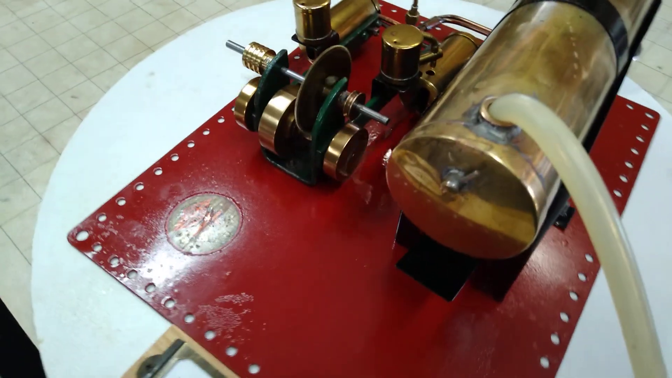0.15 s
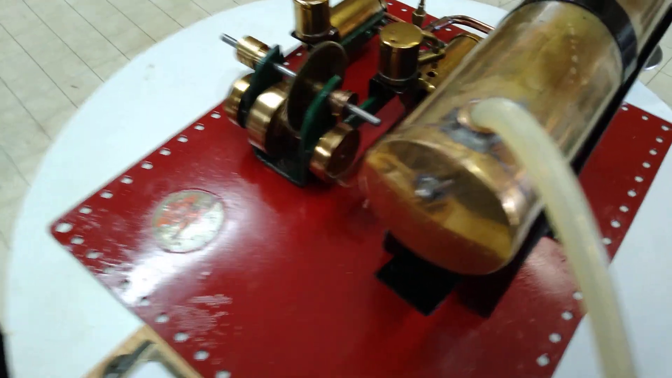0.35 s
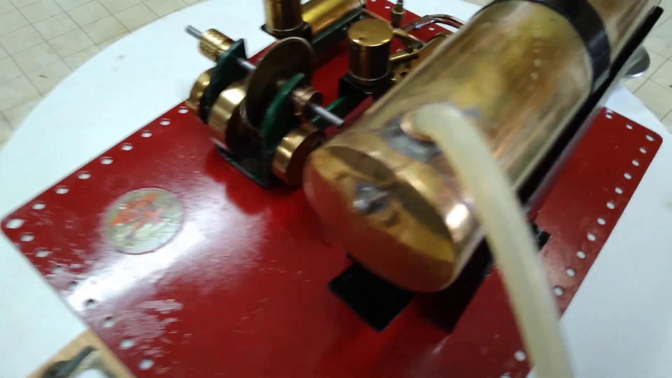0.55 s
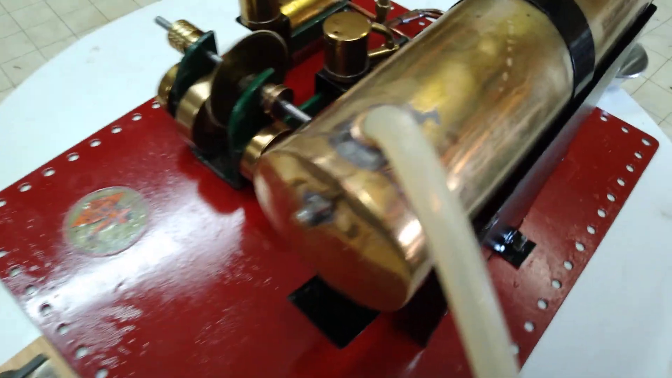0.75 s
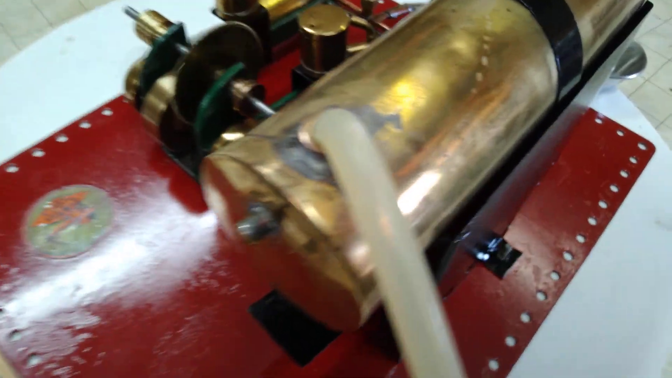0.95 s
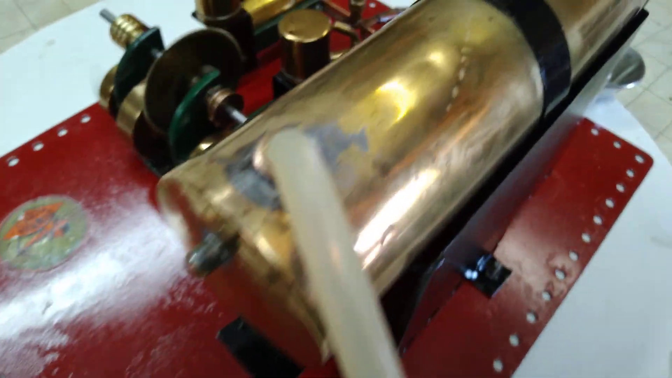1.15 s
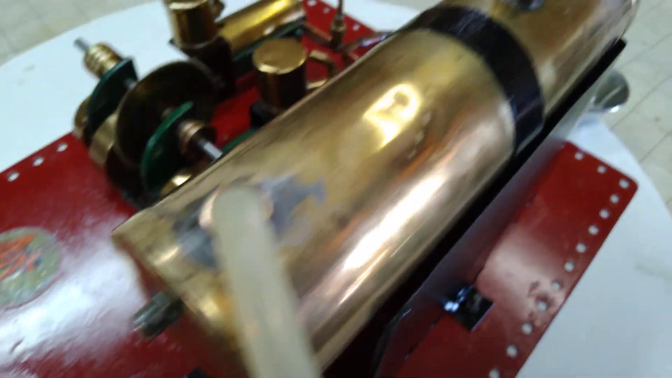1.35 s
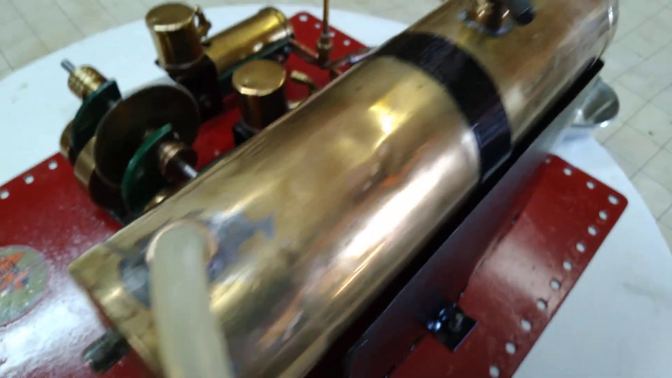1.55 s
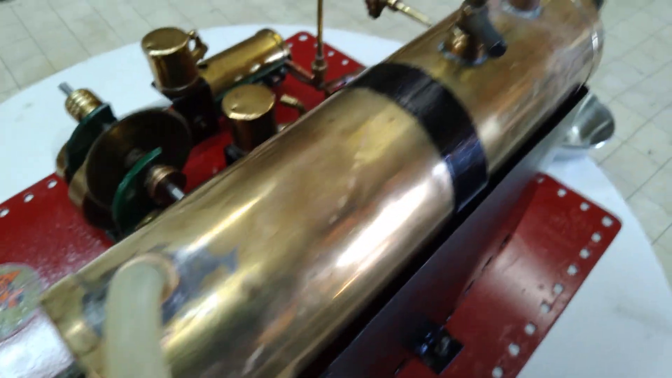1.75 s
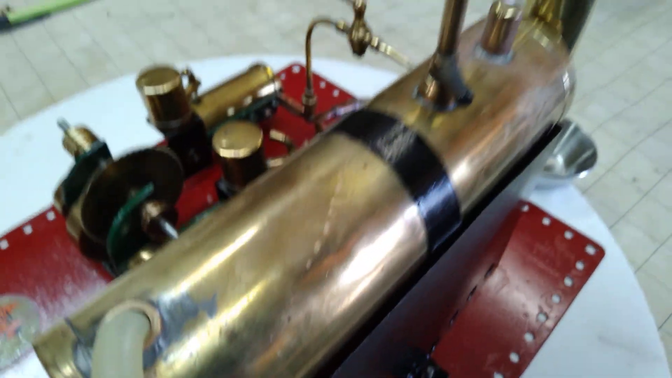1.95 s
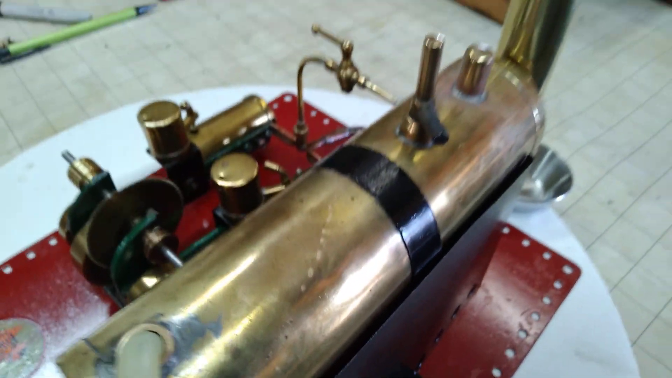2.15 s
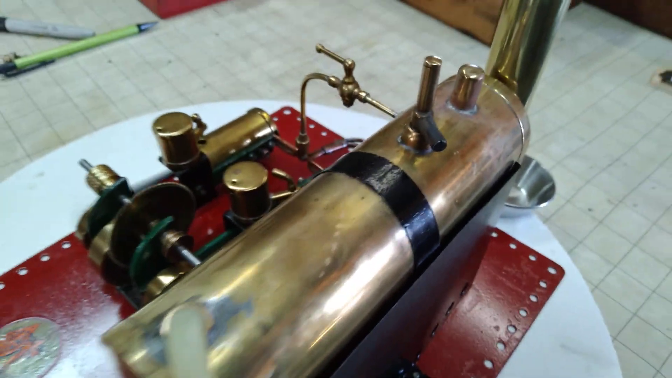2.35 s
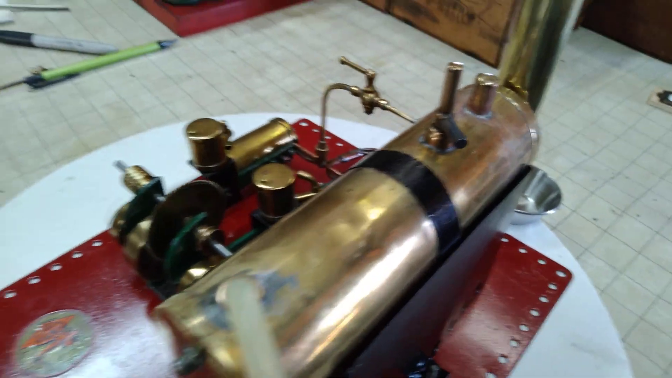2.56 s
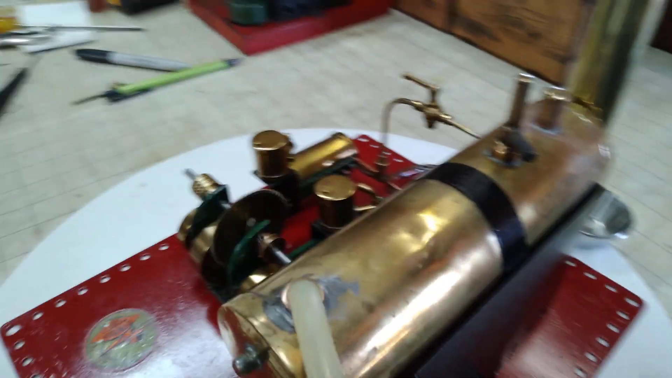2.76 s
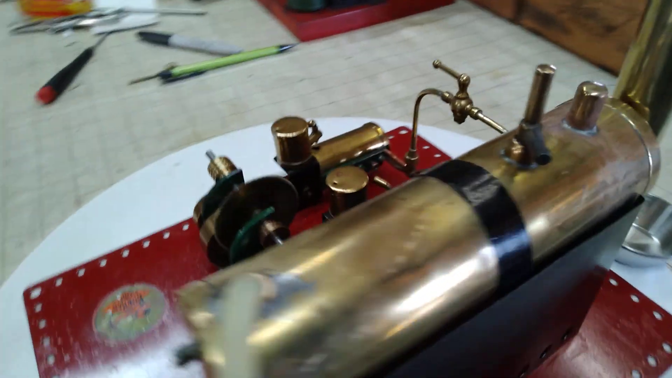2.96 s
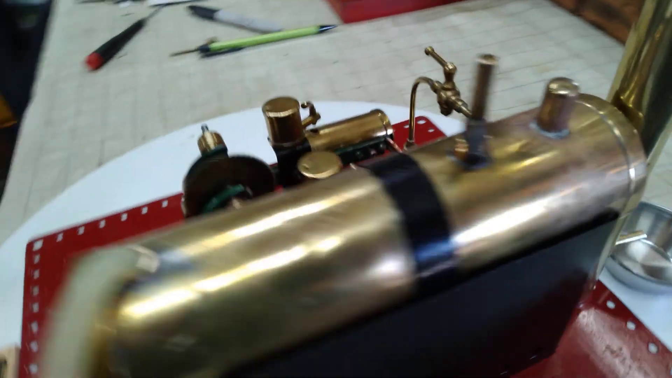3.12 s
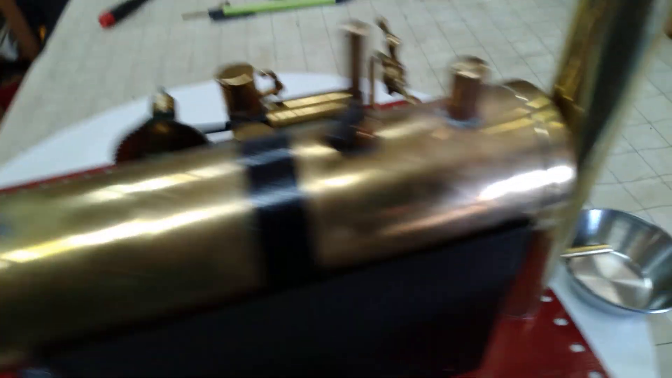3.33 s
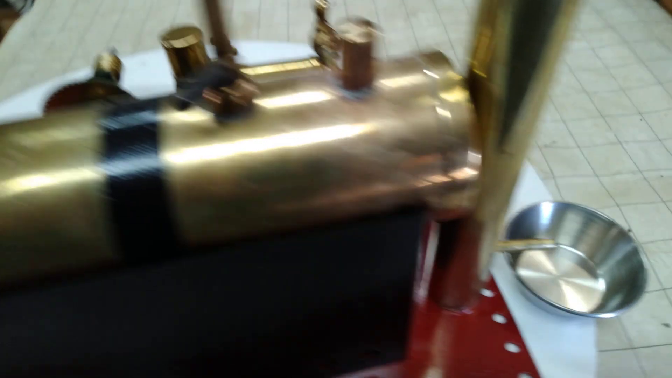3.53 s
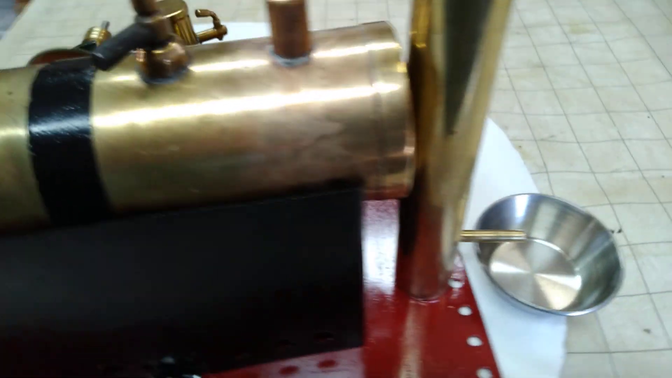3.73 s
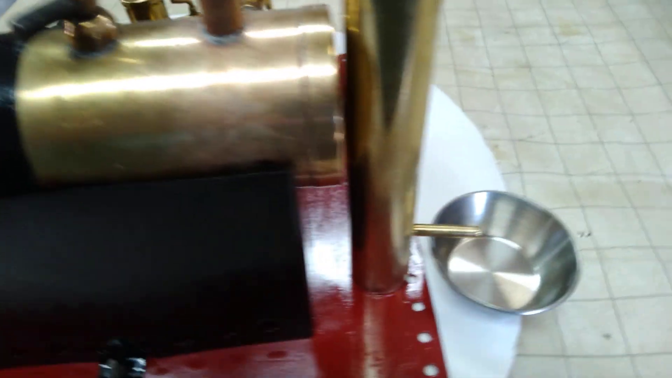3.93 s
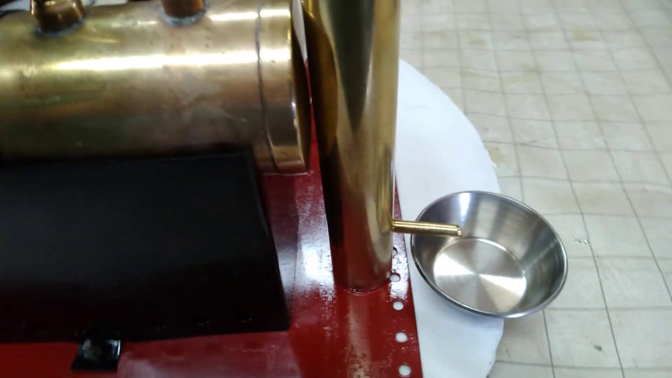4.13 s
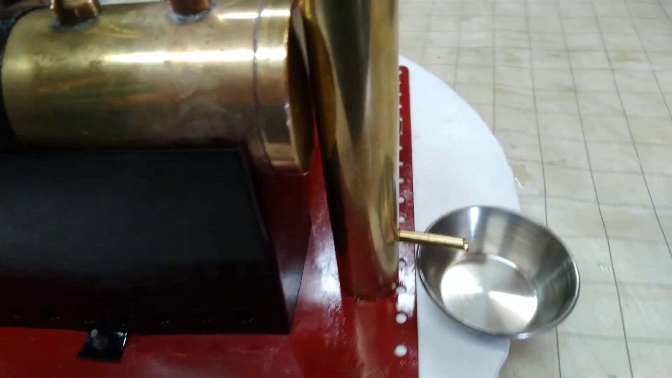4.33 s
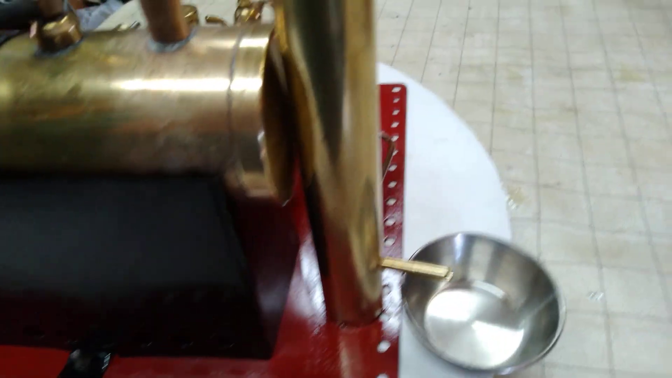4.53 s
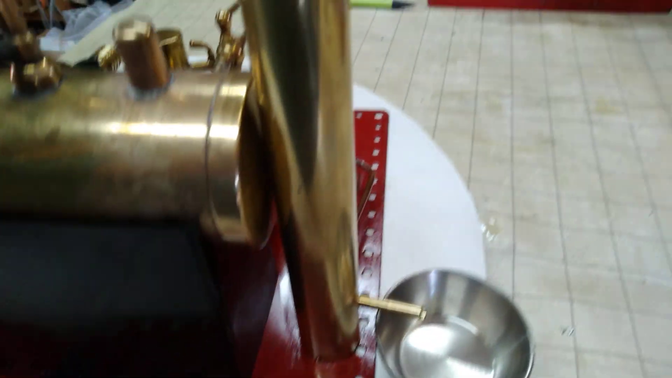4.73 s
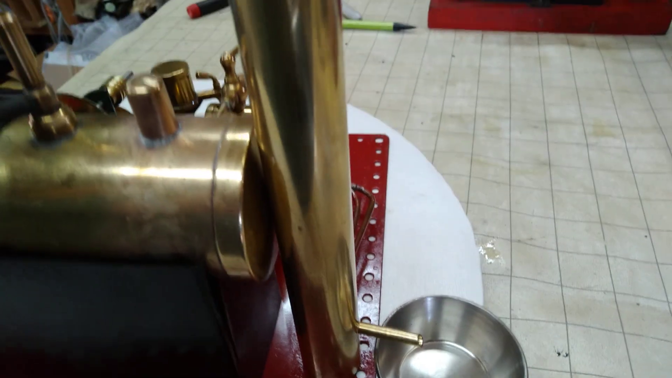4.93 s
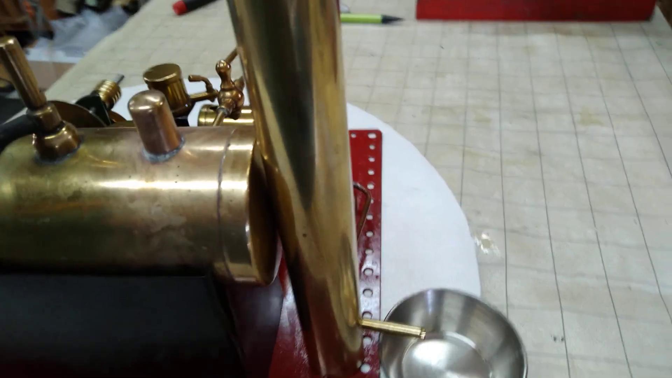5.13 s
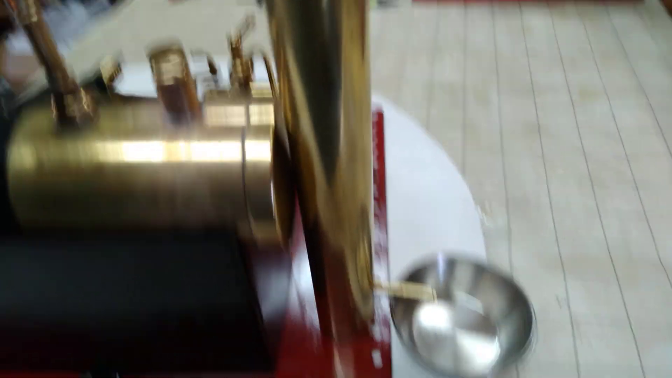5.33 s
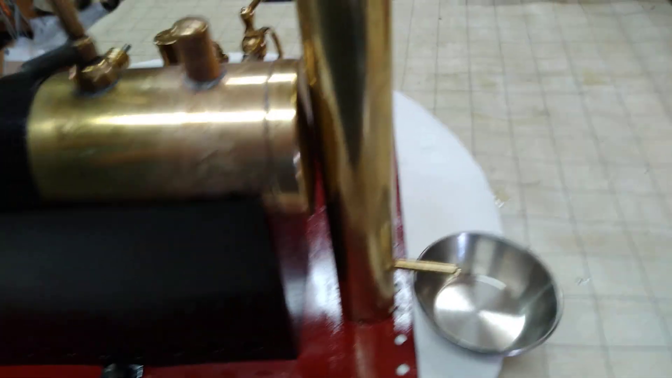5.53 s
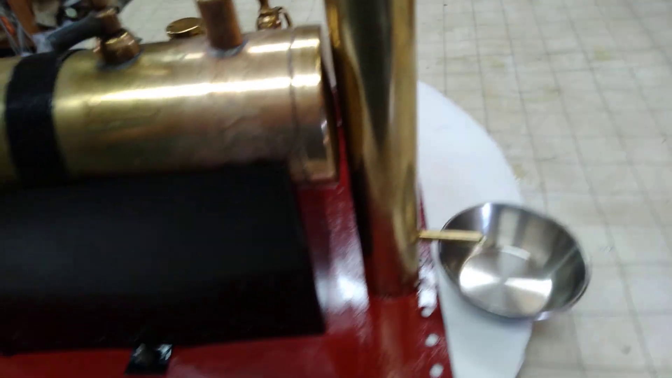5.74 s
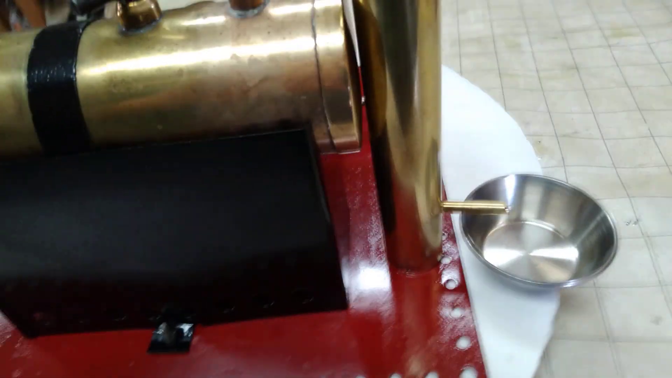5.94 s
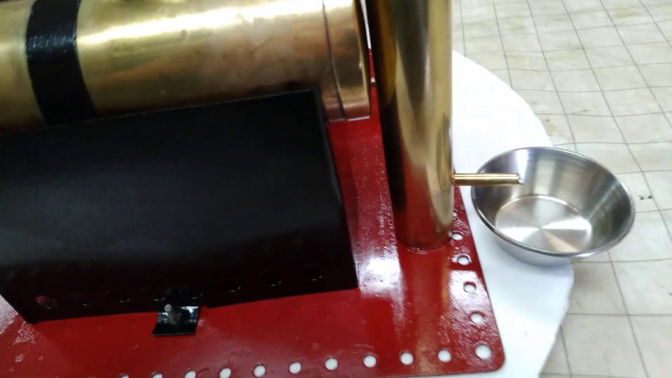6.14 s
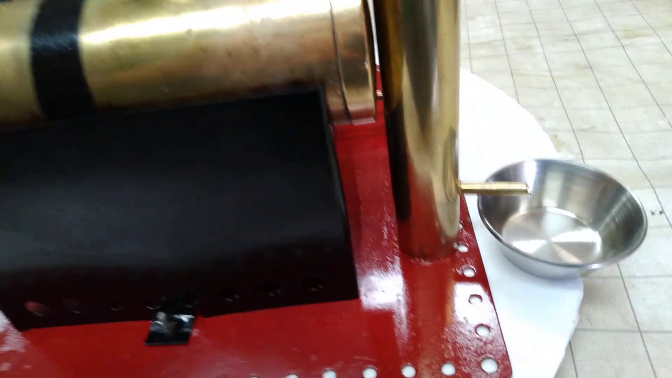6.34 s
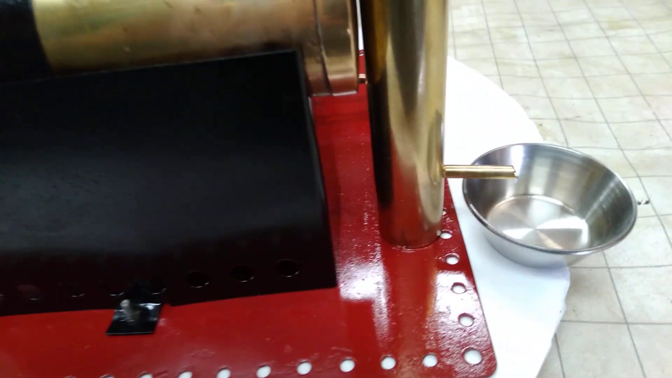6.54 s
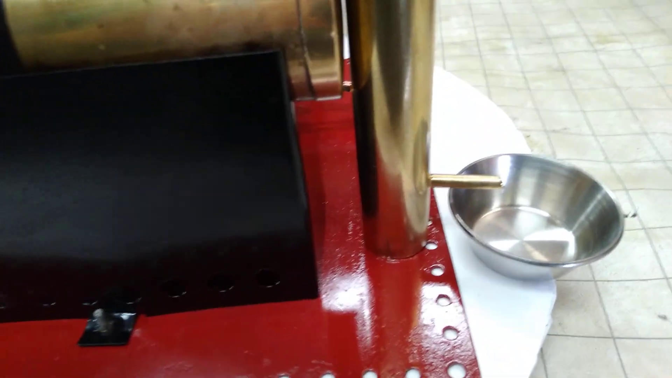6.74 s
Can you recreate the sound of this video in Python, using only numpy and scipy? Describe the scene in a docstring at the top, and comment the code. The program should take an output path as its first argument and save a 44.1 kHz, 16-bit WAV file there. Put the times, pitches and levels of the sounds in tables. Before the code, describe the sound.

Close stereo phone pickup of a miniature engine running without pause: about thirteen turns per second, each a cluster of metallic knocks with ringing brass, small low thumps through a tin plate and hollow exhaust puffs. Gears rasp strongly early on, then recede as the microphone passes behind the boiler. The room is quiet with a short faint echo; towards the end the treble thins and a narrow buzzing hum swells.

```python
"""A fast metallic clatter with a raspy buzz: a small twin-cylinder model steam engine on compressed air.
It makes about 13.5 turns a second on a tin baseplate in a small workshop.
Every turn, loose bearings and gears knock and ring the brass, pistons thump the plate
and puffs of exhaust sound the chimney, while air hisses from the glands.
A hand-held phone moves along the boiler to the chimney end, so each part is heard differently on the way."""
import sys
import numpy as np
from scipy import signal
from scipy.fft import rfft, irfft
from scipy.io import wavfile
from scipy.ndimage import uniform_filter1d

SR = 44100
rng = np.random.default_rng(int(sys.argv[2]) if len(sys.argv) > 2 else 0)


def file_out(sig):
    """Save sig as 16-bit WAV at sys.argv[1]."""
    # one column per channel
    cols = np.atleast_2d(sig).T
    # limit, then scale
    lim = np.clip(cols, -1, 1)
    pcm = np.round(lim * 32767).astype(np.int16)
    wavfile.write(sys.argv[1], SR, pcm)


N = 298998


def undb(db):
    """Turn decibels into gain."""
    return 10 ** (np.asarray(db) / 20)


def unit(x):
    """Scale so that the average of the channels has rms 1."""
    middle = np.atleast_2d(x).mean(axis=0)
    return x / np.sqrt(np.mean(middle ** 2))


def curves(table):
    """Draw each column of a time table as a line, sample by sample."""
    s, *columns = np.transpose(table)
    return [np.interp(np.arange(N) / SR, s, c) for c in columns]


def pan(db):
    """Left and right gains for a level difference, keeping the mean power."""
    gains = np.array([undb(db / 2), undb(-db / 2)]).reshape(2, -1)
    return gains / np.sqrt(np.mean(gains ** 2, axis=0))


def band(x, low_hz, high_hz, order=3):
    """Keep one band of frequencies."""
    return signal.sosfilt(signal.butter(order, [low_hz, high_hz], "band", fs=SR, output="sos"), x)


def colour(x, hz, db, size=512):
    """Filter through (f/Hz, level/dB) points without sounding ahead of time (minimum phase)."""
    f = np.maximum(np.arange(size // 2 + 1) * SR / size, 1)
    cepstrum = irfft(np.log(undb(np.interp(np.log(f), np.log(hz), db))))
    # folding the cepstrum forward puts all of the response after time zero
    cepstrum[1:size // 2] *= 2
    cepstrum[size // 2 + 1:] = 0
    return signal.fftconvolve(x, irfft(np.exp(rfft(cepstrum))))[:N]


def ring(x, modes, place, damping=1):
    """Parallel resonances, each with its own side and its own change of level with place (0-1)."""
    total = 0
    for hz, width, db, side_db, change_db in modes:
        gain = undb(db) * (1 + place * (undb(change_db) - 1))
        rung = signal.lfilter(*signal.iirpeak(hz, hz / (width * damping), SR), x)
        total = total + gain * pan(side_db) * rung
    return total


def strikes(times, sizes):
    """Single-sample impulses at the given times."""
    out, at = np.zeros(N), np.round(times * SR).astype(int)
    inside = (at >= 0) & (at < N)
    np.add.at(out, at[inside], sizes[inside])
    return out


def fade(x, decay_s):
    """Give every impulse an exponential tail."""
    return signal.lfilter([1], [1, -np.exp(-1 / (decay_s * SR))], x)


def noise_pair(apart):
    """Noise for two microphones; apart is the weight of the unshared part."""
    shared, own = rng.standard_normal((2, N))
    return (shared + apart * own * np.array([[1], [-1]])) / np.sqrt(1 + apart ** 2)


def each_turn(turns, angle, db, scatter_db, scatter_s, share=1, memory=0):
    """An impulse whenever the crank passes an angle; with memory, time and strength drift slowly."""
    passes = np.arange(int(turns[-1]) + 1) + angle
    times = np.interp(passes, turns, np.arange(N) / SR, left=-1, right=-1)
    chance = rng.standard_normal((len(times), 2)).T
    late, louder = signal.lfilter([np.sqrt(1 - memory ** 2)], [1, -memory], chance)
    happens = rng.random(len(times)) < share
    return strikes(times + scatter_s * late, happens * undb(db + scatter_db * louder))


def left_late(x, lag_s):
    """The engine is to the right, so its sound reaches the left microphone later."""
    n = np.arange(N)
    return np.array([np.interp(n - lag_s * SR, n, x[0]), x[1]])


def sway(rate):
    """Slow chance movement of a hand-held phone; spread near 1, rate in steps per second."""
    k = int(SR / rate)
    steps = np.repeat(rng.standard_normal(N // k + 1), k)
    return 1.75 * uniform_filter1d(uniform_filter1d(steps, k), k)[:N]


# crank speed, which creeps up, sags just after 3 s and recovers: t/s, speed/(turns per s)
CRANK_SPEED = [(0.0, 13.35), (0.45, 13.438), (0.95, 13.374), (2.4, 13.509), (2.9, 13.61), (3.15, 13.47),
               (4.15, 13.404), (4.95, 13.635), (5.9, 13.623), (6.35, 13.727), (6.78, 13.536)]


def crank():
    """Crank position in turns: the speed added up over time."""
    start_turns = .006
    return start_turns + np.cumsum(curves(CRANK_SPEED)[0]) / SR


TOP_HZ = 15900
# tone colour of the quiet workshop: f/Hz, relative level/dB (per Hz)
QUIET_COLOUR = [(20, -23), (42, -1), (70, 37), (150, -13), (400, -23), (1000, -19), (3000, -23),
                (16000, -20)]


def workshop(x, t60_s=0.19, wet_db=-18, quiet_db=-66):
    """A short diffuse echo of mids and treble from bench and walls, over the quiet of the room."""
    t = np.arange(SR // 2) / SR
    tails = rng.standard_normal((2, len(t))) * np.exp(-np.log(1000) * t / t60_s) * (t > .004)
    tails /= np.sqrt(np.sum(tails ** 2, axis=1, keepdims=True))
    echo = signal.fftconvolve(band(x, 560, TOP_HZ), tails, axes=1)[:, :N]
    hz, db = np.transpose(QUIET_COLOUR)
    quiet = unit(np.array([colour(n, hz, db, size=4096) for n in noise_pair(0.18)]))
    return x + undb(wet_db) * echo + undb(quiet_db) * quiet


# shocks that the moving parts give the plate: crank angle/turns, level/dB
PLATE_SHOCKS = [(0.112, -0.5), (0.279, -2), (0.46, -3), (0.561, -1.5), (0.716, -9.5), (0.859, 1),
                (0.969, 3.5)]
# low modes of plate and table: f/Hz, width/Hz, level/dB, left minus right/dB, change behind the boiler/dB
TABLE_MODES = [(71.5, 34, -0.5, -10, 13.5), (99, 65, 2.5, 19, -18), (143.4, 30.5, 7, -3, 2),
               (167, 7.3, -9, -29, -20), (227.3, 4.6, 4, -11, -20), (345, 130, -11, -11, -29),
               (442, 48, -2, 1.5, 10.5)]
# bass along the phone's path: t/s, deep bass level/dB, upper bass level/dB
BASS_PATH = [(0, -1, -5), (.8, -1, -1), (1.5, 1, 0), (2.15, -1, 1.5), (2.6, -0.5, -4.5), (2.9, -3, 2.5),
             (3.2, -4.5, 2), (3.7, 0, 1.5), (4.5, 0, 2.5), (4.9, 0, -1), (5.25, -3.5, -1), (5.65, 1, -4),
             (6.05, -1, 3), (6.3, 0.5, -1), (6.78, 2.5, 4.5)]


def baseplate(turns, place):
    """Pistons and cranks shake the plate and the table under it, almost alike in every turn."""
    shocks = sum(each_turn(turns, angle, db, 1, .0003, memory=.94) for angle, db in PLATE_SHOCKS)
    shocks = shocks + .012 * noise_pair(1.0)
    deep = band(ring(shocks, TABLE_MODES[:2], place), 48, 500, order=4)
    upper = band(ring(shocks, TABLE_MODES[2:], place), 48, 500, order=4)
    deep_db, upper_db = curves(BASS_PATH)
    return unit(deep * undb(deep_db) + upper * undb(upper_db))


# modes of the frame: f/Hz, width/Hz, level/dB, left minus right/dB, change behind the boiler/dB
CLACK_MODES = [(880, 120, 2.5, 0, 4), (1230, 90, -6, -3, -5), (1650, 73, -3.5, 0, 0),
               (1980, 290, -8, -4, 1.5)]
# level of the clack, which sets in as the speed sags: t/s, level/dB
CLACK_PATH = [(2.9, -75), (3.25, -59), (4.4, -55), (5.6, -56.5), (6.1, -70)]


def clack(hit, place, decay_s=0.0014):
    """One knock of the return stroke also rattles the frame with a dull clack."""
    rattle = noise_pair(0.97) * np.sqrt(fade(hit ** 2, decay_s / 2))
    return unit(band(ring(rattle, CLACK_MODES, place), 650, 2900)) * undb(curves(CLACK_PATH)[0])


# exhaust puffs in each turn: crank angle/turns, level/dB
EXHAUST_PUFFS = [(.01, -3.5), (0.075, -6), (0.191, -8), (0.291, -9.5), (.36, -6), (0.423, -8.5), (.5, -10),
                 (0.572, -7.5), (0.639, -4.5), (0.736, -8), (0.866, -4)]
# air column of exhaust pipe and chimney:
# f/Hz, width/Hz, level/dB, left minus right/dB, change behind the boiler/dB
PIPE_MODES = [(430, 32, -6.5, -24, -7), (461.3, 31.7, -0.5, -4.5, 3), (845, 59, 3.5, -9, -5.5),
              (894, 26, 5, 3.5, -4.5), (948, 88, -9, 6.5, 11.5), (1041, 62, -7.5, -1.5, 9.5),
              (1260, 90, 0, 1, -6.5)]


def exhaust(turns, place, puff_s=0.0052, flow=0.18, pop_db=0.0, lag_s=0.00019):
    """Air leaves in puffs: a port opens with a pop that sounds the pipe, then air rushes through it."""
    pops = sum(each_turn(turns, angle, db, 1.2, .0003, memory=.96) for angle, db in EXHAUST_PUFFS)
    rush = band(unit((fade(pops, puff_s) + flow) * noise_pair(0.19)), 600, 4100)
    drive = rush + undb(pop_db) * unit(pops)
    return unit(left_late(ring(drive, PIPE_MODES, place), lag_s))


# gear rasp in the baseplate:
# f/Hz, width/Hz, level/dB, left minus right/dB, change in the firebox's shadow/dB
PLATE_MODES = [(303, 120, 8, -8, -4), (432, 130, 10.5, -2.5, -24), (736, 130, 0, 9, -17),
               (1080, 60, 0, -5, 14), (1232, 146, -9, -14, 17), (1463, 54, 8.5, -3.5, 8),
               (1602, 84, 6, 6.5, 4), (1817, 280, 1, 0.5, 1.5), (2334, 38.5, 12, -27, 0),
               (3080, 670, 9.5, -4.5, -26)]


def gears(turns, shadow, depth=0.098, lope=0.38, lope_turns=0.8, teeth_db=-7, buzz_hz=1500, count=256):
    """Gears rasp, harder on power strokes and once a turn in the shadow; uneven teeth repeat a buzz."""
    strokes = depth * np.cos(2 * np.pi * 2 * (turns - .08))
    once_a_turn = lope * shadow * np.cos(2 * np.pi * (turns - lope_turns))
    load = 1 + strokes + once_a_turn
    # one random outline of count points, read again on every turn
    outline = rng.standard_normal(count)
    teeth = band(np.interp(turns, np.arange(count) / count, outline, period=1), 200, buzz_hz)
    teeth = teeth * undb(teeth_db) / np.sqrt(SR / CRANK_SPEED[0][1] / count)
    scrape = band(noise_pair(0.58), 457, 7200, order=2)
    return unit(left_late(ring(load * (scrape + teeth), PLATE_MODES, shadow), 0.00039))


# gear rasp, loudest while the gears lie open to the phone: t/s, level/dB (before a gain), left minus right/dB
RASP_PATH = [(0.2, -41, 4.5), (.75, -41.5, 1), (.92, -45.5, -2.5), (1.36, -46, -4), (2.3, -51, -5.5),
             (2.8, -52.5, -1), (3.12, -54, -1), (3.75, -52.5, -5), (4.15, -58, -6), (4.35, -54.5, -9),
             (4.98, -52.5, -5.5), (5.69, -55, -4), (6.6, -53, -10)]


def rasp_at_phone(turns, shadow, gain_db=4):
    """The gear rasp at the level and side where the phone hears it."""
    rasp_db, side_db = curves(RASP_PATH)
    return band(gears(turns, shadow), 192, 3320) * undb(rasp_db + gain_db) * pan(side_db)


# narrow band of noise that swells late and rises a little: t/s, f/Hz, level/dB
LATE_HUM_PATH = [(5.85, 1450, -80), (6.1, 1460, -59), (6.4, 1486, -53), (6.78, 1560, -52)]


def late_hum(turns, width_hz=115, lope=0.43, lope_turns=0.62):
    """A narrow band of noise near 1.5 kHz swells late, pulsing once a turn."""
    hz, db = curves(LATE_HUM_PATH)
    lowpass = signal.butter(2, width_hz / 2, fs=SR, output="sos")
    flutter = signal.sosfilt(lowpass, noise_pair(0.56) + 1j * noise_pair(0.71))
    tone = np.real(flutter * np.exp(2j * np.pi * np.cumsum(hz) / SR))
    return unit(tone * (1 + lope * np.cos(2 * np.pi * (turns - lope_turns)))) * undb(db)


def ping(hz, size=200, rise_s=.00025):
    """A tooth falling through its backlash: a very short ping that swells for rise_s, then dies."""
    t = np.arange(size) / SR
    return np.sin(2 * np.pi * hz * t) * t / rise_s * np.exp(1 - t / rise_s)


def pings(at, sizes, pitches, size=200):
    """Pings at the given samples, each with its own strength and pitch."""
    out = np.zeros(N + size)
    for i, gain, hz in zip(at, sizes, pitches):
        out[i:i + size] += gain * ping(hz, size=size)
    return out[:N]


# faint ticks of gear backlash: crank angle/turns, relative level/dB, share of turns that have it
BACKLASH_TICKS = [(.15, 6, .25), (.325, 7, .2), (.708, 8, .45), (.79, 6, .12)]


def ticks(turns, tick_hz=9400, spread=0.13):
    """Faint backlash ticks come and go at a few crank angles."""
    hits = sum(each_turn(turns, angle, db, 2, .0002, share) for angle, db, share in BACKLASH_TICKS)
    at = np.flatnonzero(hits)
    return pings(at, hits[at], tick_hz * np.exp(spread * rng.standard_normal(len(at))))


# loudest single clicks of the gears: t/s, level/dB (before panning), f/Hz
GEAR_CLICKS = [(0.0292, -3, 9600), (0.1041, -11, 10500), (0.1194, -10, 9800), (0.1278, -11, 9200),
               (0.194, -8, 10700), (0.277, -11, 9100), (0.625, -8, 9800), (0.6996, -5, 9500),
               (0.7901, -9, 10200), (0.7986, -10, 8800), (0.8732, -9, 8700), (0.9478, -10, 8700),
               (1.0141, -12, 10800), (1.0729, -12, 9900), (1.148, -6, 9500), (1.1634, -12, 9600),
               (1.2226, -6, 10100), (1.2466, -10, 8700), (1.2974, -4, 9700), (1.3718, -10, 10300),
               (1.3955, -11, 8800), (1.4616, -11, 9500), (1.5207, -9, 9800), (1.536, -10, 9500),
               (1.5953, -8, 10100), (1.6105, -11, 9500), (1.6859, -12, 9800), (1.7445, -6, 9400),
               (1.7593, -12, 9600), (1.8878, -11, 9600), (1.9076, -11, 9600), (1.9163, -9, 8700),
               (1.982, -12, 10000), (2.1895, -10, 9700), (2.2044, -12, 9400), (2.2882, -12, 9000),
               (2.3615, -10, 9000), (2.4359, -10, 8800), (2.5097, -11, 8800), (2.5603, -8, 9200),
               (2.5751, -12, 9500), (2.8699, -14, 9600), (2.9276, -15, 9700), (2.9431, -12, 9500),
               (2.9517, -14, 8900), (3.0168, -14, 9500)]


def clicks(side_db=-26):
    """Now and then a tooth snaps over hard."""
    s, db, hz = np.transpose(GEAR_CLICKS)
    return pings((s * SR).astype(int), undb(db), hz) * pan(side_db)


# main knocks that land harder than the rest: t/s, extra level/dB
HARD_BLOWS = [(1.045, 1.5), (1.938, 3), (2.012, 2.5), (2.606, 2.5), (3.047, 3.5)]


def accents(span_s=.008):
    """Extra gain around the few hard knocks."""
    t = np.arange(N) / SR
    return undb(sum(db * (np.abs(t - s) < span_s) for s, db in HARD_BLOWS))


# three tones that the main knock rings in the brass: f/Hz, width/Hz, level/dB, left minus right/dB
BRASS_TONES = [(7070, 90, 3, -7), (8970, 135, 1.5, -14), (11010, 100, 1.5, -11)]
# extra level of each tone, which changes from spot to spot:
# t/s, first level/dB, second level/dB, third level/dB
TONE_PATH = [(0.1, -40.5, -33, -38), (0.6, -37, -38, -32.5), (1.1, -43, -32.5, -35),
             (1.55, -38, -31.5, -38), (2.05, -33, -32.5, -47), (2.6, -43, -28, -50), (3, -42.5, -32, -39),
             (3.4, -45, -47, -44), (3.85, -40.5, -51, -42), (4.3, -50.5, -41, -41),
             (4.7, -57, -42.5, -43.5), (5.15, -51.5, -61, -50), (5.6, -44.5, -40.5, -40.5),
             (6.1, -59, -55, -48), (6.6, -62, -58, -51.5)]


def tones(hits, side_db, rattle_db=-5, rattle_s=0.0035, light_db=-15):
    """The main knock flashes three tones in the brass; the lighter knocks barely stir them."""
    blows = hits[0] + undb(light_db) * sum(hits[1:])
    rattle = unit(noise_pair(1.0) * np.sqrt(fade(blows ** 2, rattle_s)))
    drive = unit(blows) + undb(rattle_db) * rattle
    total = 0
    for (hz, width, db, own_side_db), path_db in zip(BRASS_TONES, curves(TONE_PATH)):
        rung = unit(signal.lfilter(*signal.iirpeak(hz, hz / width, SR), drive))
        total = total + rung * undb(db + path_db) * pan(side_db + own_side_db)
    return total


def chatter():
    """Power of the tiny irregular ticks of valve gear and linkage between the knocks."""
    per_s, decay_s = 90, .0009
    when, size = rng.random((int(per_s * N / SR), 2)).T
    db = -26.5 + 5 * (2 * size + 3)
    return fade(strikes(when * N / SR, undb(db)) ** 2, decay_s / 2)


# knocks in each turn: crank angle/turns, level/dB, scatter/dB, timing scatter/s, rattle decay/s,
# share of turns that have it, change behind the boiler/dB
KNOCK_LIST = [(-.003, .7, .6, .00015, .003, 1, -.5), (.03, -3.5, .7, .0004, .0023, 1, 0),
              (.25, -17, 2, .0008, .003, .7, 5), (.35, -8, 1.5, .0005, .002, .85, 0),
              (.382, -4, 1.5, .0006, .0026, 1, 1.5), (.527, -13, 2, .0003, .0015, .8, 0),
              (.585, -3.5, 1.3, .0004, .0024, 1, 1), (.618, -9, 2, .0004, .0015, .7, 0),
              (.922, -11, 1.2, .0002, .0035, 1, 4)]


def knock_hits(turns, place):
    """Impulses of every knock in the loose bearings and gears; the main knock comes first."""
    hits = []
    for angle, db, scatter_db, scatter_s, _, share, behind_db in KNOCK_LIST:
        hit = each_turn(turns, angle, db, scatter_db, scatter_s, share)
        hits.append(hit * undb(behind_db * place))
    hits[0] = hits[0] * accents()
    return hits


# brass parts: f/Hz, width/Hz (before damping), level/dB, left minus right/dB, change behind the boiler/dB
BRASS_MODES = [(2295, 28, -25, 14, 12), (3166, 157, 2, 2, -10.5), (6080, 13, -7, 40, 11),
               (7710, 41, -13.5, -16, 15), (8950, 160, 4, -16, -10), (9200, 200, 0.5, -7, 1.5),
               (9700, 64, -9.5, -23, 3.5), (12900, 71, -26, 17, -14), (15150, 130, -3, 29, -15)]
# colour of metal contact beside the engine: f/Hz, left level/dB, right level/dB
OPEN_COLOUR = [(1460, -43, -63.5), (2410, -33, -16.5), (3460, 2, -21.5), (4800, 3, -10), (5570, -1, -9.5),
               (6200, -0.5, -6), (7070, 7.5, -6.5), (7800, -12, -6), (8600, 2, -5), (8800, -28, 0),
               (11300, 4, -5), (11950, -23, -14.5), (15000, -8, -2.5), (16100, 2, -15.5)]
# colour of metal contact behind the boiler: f/Hz, left level/dB, right level/dB
SHADED_COLOUR = [(1510, -32, -5), (2400, -21, -21.5), (3714, 5, -19), (4770, -9, -3), (6080, 1, -8),
                 (6450, -13, -12.5), (7170, -4.5, -10), (10660, -67, -1), (10640, -33, 3), (12850, -10, -4),
                 (16400, 0, -7)]


def clatter(hits, place, hiss_db=-27, ring_db=-1, grain_db=0.5, smear_db=-22, shaded_smear_db=14,
            shaded_hiss_db=5, light_ring=1.0):
    """Play in the bearings closes with a short rattle; contact noise and leaking air ring the brass."""
    rise_s, shaded_rise_s, smear_s = .0008, .003, .028
    knocks = [fade(hit ** 2, knock[4] / 2) for hit, knock in zip(hits, KNOCK_LIST)]
    # each knock starts hard in the open and softer once it has to come round the boiler
    power = sum(weight * fade(sum(knocks), s) / (s * SR)
                for weight, s in ((1 - place, rise_s), (place, shaded_rise_s)))
    # each rattle is a string of tiny bounces of uneven strength
    bounces = np.repeat(undb(grain_db * rng.standard_normal(N // 20 + 1)), 20)[:N]
    # behind the boiler more of each knock arrives late, by reflection
    late = fade(power, smear_s) / (smear_s * SR) * undb(smear_db + shaded_smear_db * place) ** 2
    hiss = undb(hiss_db + shaded_hiss_db * place)
    drive = noise_pair(1.0) * np.sqrt(power * bounces ** 2 + late + chatter() + hiss ** 2)
    contact = 0
    for table, weight in ((OPEN_COLOUR, 1 - place), (SHADED_COLOUR, place)):
        hz, *sides = np.transpose(table)
        contact = contact + weight * np.array([colour(d, hz, db) for d, db in zip(drive, sides)])
    # light_ring weighs the lighter knocks against the main knock and its rebound
    blows = np.sqrt(sum(knocks[:2]) + light_ring ** 2 * (sum(knocks[2:]) + hiss ** 2 / 2))
    brass = ring(noise_pair(1.0) * blows, BRASS_MODES, place, damping=0.78)
    # parts this small radiate no bass
    highpass = signal.butter(4, 2000, "high", fs=SR, output="sos")
    return unit(signal.sosfilt(highpass, contact + undb(ring_db) * brass))


def off_boiler(x, place, share=0.06, lag_s=0.00015, far_lag_s=0.00019):
    """The boiler's side mirrors the clatter; its detour follows the phone, so treble dips glide."""
    n = np.arange(N)
    then = n - (lag_s + (far_lag_s - lag_s) * place) * SR
    return unit(x + share * np.array([np.interp(then, n, side) for side in x]))


# colour of the firebox's shadow: f/Hz, level/dB
SHADOW_COLOUR = [(2000, 0), (3200, -10.5), (4700, -6.5), (5900, 3.5), (7000, 0), (8400, 4), (9100, 5),
                 (11000, 0), (13000, -3), (15800, -2)]


def firebox_shadow(x, shadow):
    """Blend in the tone colour of the firebox's shadow as the phone sinks into it."""
    hz, db = np.transpose(SHADOW_COLOUR)
    return (1 - shadow) * x + shadow * np.array([colour(side, hz, db) for side in x])


def off_fittings(x, place, nearest_s=0.0004973, farthest_s=.0032, drift_s=.00005, rate=1.403, count=5):
    """Chimney, plate and bowl mirror the clatter; detours sway with the hand, so fine ripples wander."""
    mirror_db, mirror_behind_db = -15, 5
    n, gain = np.arange(N), undb(mirror_db + mirror_behind_db * place)
    lags = np.geomspace(nearest_s, farthest_s, count)
    mirrored = np.array([sum(np.interp(n - (lag + drift_s * sway(rate)) * SR, n, side) for lag in lags)
                         for side in x])
    return (x + gain * mirrored) / np.sqrt(1 + count * gain ** 2 / 2)


# dips (-) and boosts (+) in bands of the sound:
# start t/s, end t/s, start f/Hz, end f/Hz, width/Hz, level halfway/dB
BAND_DIPS = [(0.897, 2.7, 1670, 1820, 220, -6.5), (1.602, 2.3, 5750, 5780, 350, 0),
             (2.303, 3.2, 3970, 4000, 500, -1.5), (2.3, 3.3, 10450, 10550, 350, -3),
             (2.302, 3.7, 2210, 2140, 180, -20), (2.91, 3.55, 5200, 5400, 500, -19),
             (3.097, 4.1, 2730, 2970, 600, -3.5), (3.3, 4.4, 2020, 1990, 262, -16),
             (3.3, 4.7, 8050, 8400, 450, -5), (3.7, 5.116, 10700, 10650, 400, -9),
             (4.096, 5.8, 3400, 3200, 495, -1), (4.4, 6.903, 13800, 13900, 700, -6),
             (5.3, 6.6, 12300, 12400, 600, -9), (5.6, 7, 4300, 4200, 300, 2),
             (5.75, 6.9, 8280, 8350, 250, 10.5), (4.4, 6, 4000, 3860, 249, 1),
             (2.6, 4.2, 3650, 3750, 400, -3.5), (5.6, 6.9, 2750, 3080, 600, -3.5)]


def through_dips(x):
    """Each dip or boost of a band glides, grows and fades again."""
    out, t = x.copy(), np.arange(N) / SR
    for start, end, from_hz, to_hz, width, db in BAND_DIPS:
        span = slice(*np.searchsorted(t, [start, end]))
        along = (t[span] - start) / (end - start)
        # shift the band down to 0 Hz, smooth it, and shift it back
        carrier = np.exp(2j * np.pi * np.cumsum(from_hz + (to_hz - from_hz) * along) / SR)
        pole = np.exp(-np.pi * width / SR)
        smooth = signal.lfilter([1 - pole], [1, -pole], out[:, span] / carrier)
        inside = 2 * np.real(carrier * smooth)
        out[:, span] += (undb(db * np.sin(np.pi * along)) - 1) * inside
    return out


def carry(part_db, distance, place, shadow):
    """Gain of one part: it falls with distance; boiler and, well down, firebox change it."""
    db, behind_db, shadow_db = part_db
    return undb(db + behind_db * place + shadow_db * shadow ** 2) / distance


# path of the phone: t/s, distance to the engine/m, behind the boiler 0-1, down in the firebox's shadow 0-1
PHONE_PATH = [(0, 0.19, 0.25, 0.45), (.8, 0.21, 0.26, 0.31), (1.9, 0.23, 0.15, 0.11),
              (2.65, 0.29, 0.32, 0.17), (3.05, 0.27, 0.52, 0.29), (3.35, 0.27, 0.96, 0.35),
              (3.7, 0.27, 0.71, 0.41), (4.2, 0.34, 0.91, 0.58), (4.7, 0.35, 0.99, 0.52),
              (5.25, 0.37, 0.99, 0.61), (5.55, 0.34, 0.95, 0.53), (5.78, 0.38, 1, 0.59),
              (6.05, 0.41, 0.89, 1), (6.3, 0.57, 0.95, 0.96), (6.78, 0.65, 0.88, 0.9)]
# how each part carries: level at 1 m/dB, change behind the boiler/dB, change in the firebox's shadow/dB
CLATTER_CARRY = (-35, -9.5, -1.5)
EXHAUST_CARRY = (-48, 1.5, -17)
BASEPLATE_CARRY = (-61, 3.5, -6.5)
# side of the clatter: left minus right/dB, change behind the boiler/dB, change in the firebox's shadow/dB
CLATTER_SIDE = (-21, 13, 13)


def scene(tick_db=1, tick_behind_db=-10):
    """One crank drives the engine's parts; the phone's path sets how they are heard."""
    turns = crank()
    distance, place, shadow = curves(PHONE_PATH)
    place, shadow = np.clip([place, shadow], 0, 1)
    path = distance, place, shadow
    side_db, side_behind_db, side_shadow_db = CLATTER_SIDE
    side_db = side_db + side_behind_db * place + side_shadow_db * shadow
    hits = knock_hits(turns, place)

    thumps = baseplate(turns, place) * carry(BASEPLATE_CARRY, *path) + clack(hits[4], place)
    air = band(exhaust(turns, place), 397, 1233) * carry(EXHAUST_CARRY, *path)
    rasp = rasp_at_phone(turns, shadow) + late_hum(turns)
    metal = off_boiler(clatter(hits, place), place)
    metal = metal + undb(tick_db + tick_behind_db * place) * ticks(turns)
    metal = firebox_shadow(metal, shadow)
    metal = metal * carry(CLATTER_CARRY, *path) * pan(side_db) + clicks()
    brass_tones = band(tones(hits, side_db), 6740, 12100)
    engine = off_fittings(metal, place) + brass_tones + air + rasp + thumps
    return through_dips(workshop(engine))


def record(dry):
    """The phone cuts the top of the treble."""
    return signal.sosfilt(signal.ellip(10, .2, 80, TOP_HZ, fs=SR, output="sos"), dry)


dry = scene()
out = record(dry)
file_out(out)
```